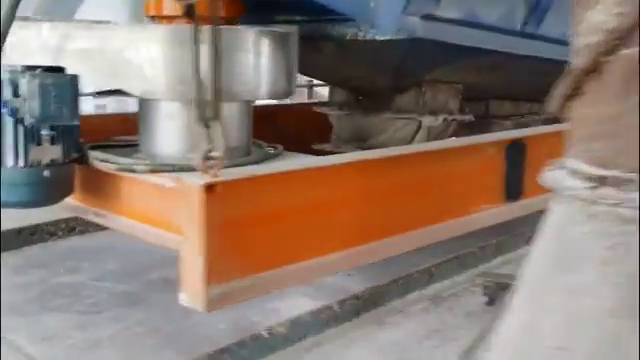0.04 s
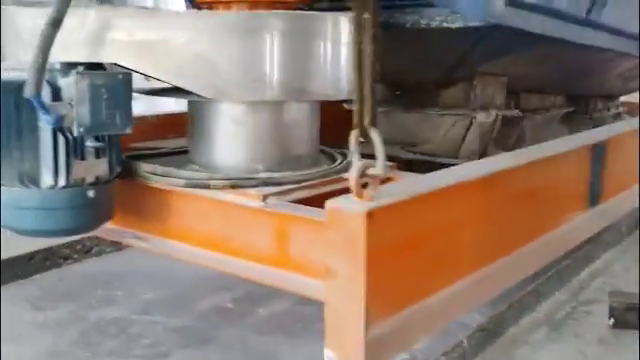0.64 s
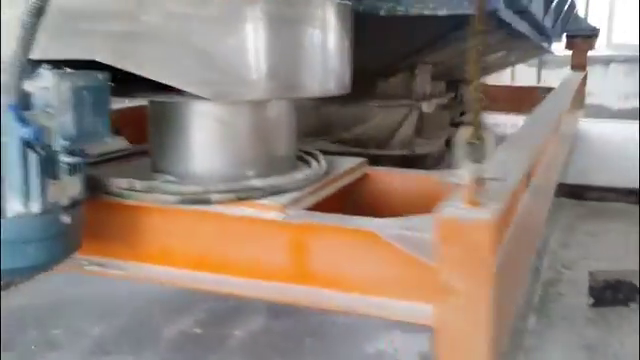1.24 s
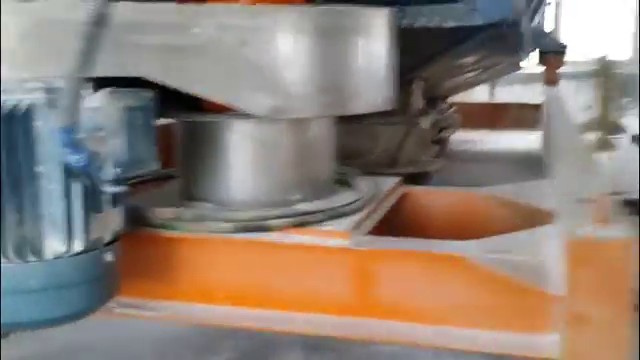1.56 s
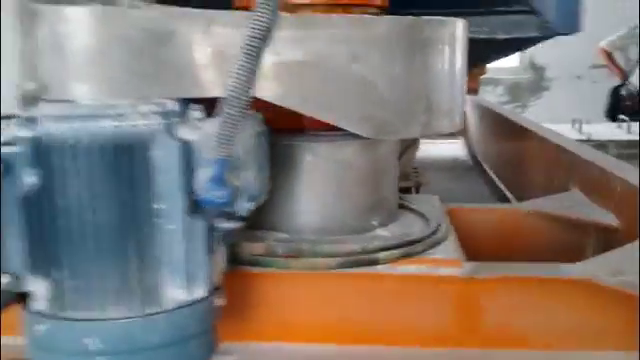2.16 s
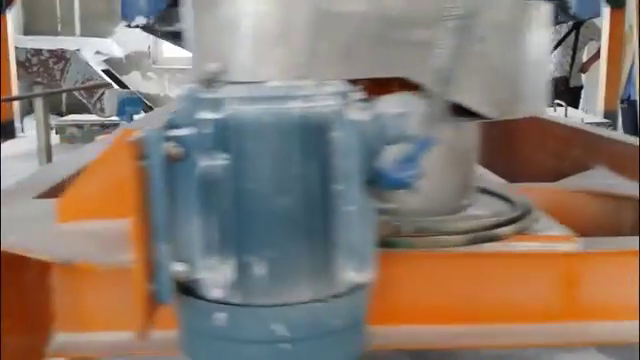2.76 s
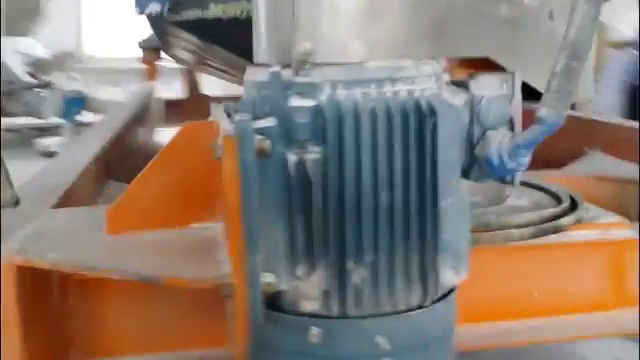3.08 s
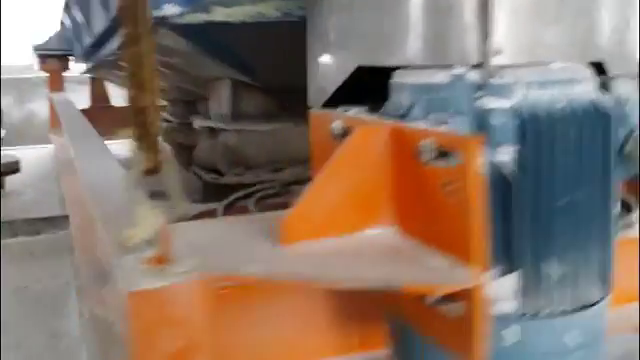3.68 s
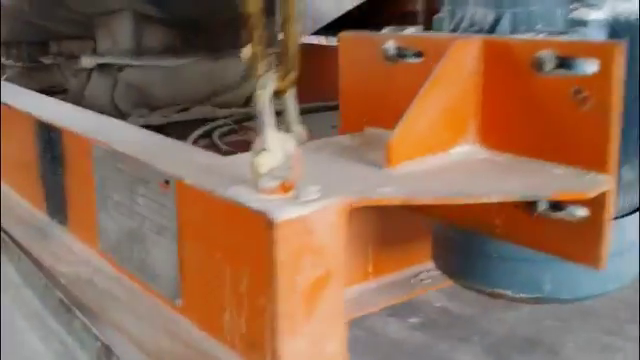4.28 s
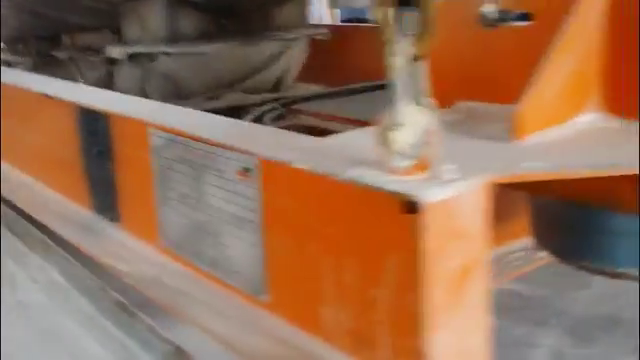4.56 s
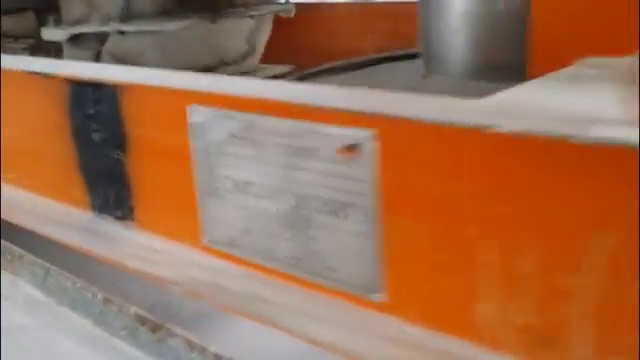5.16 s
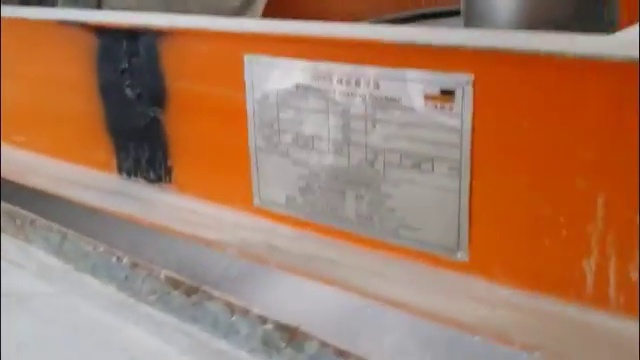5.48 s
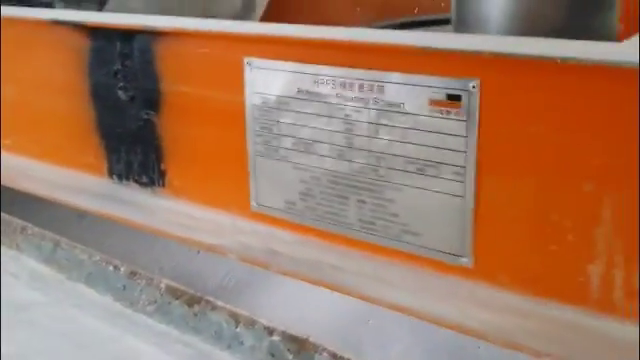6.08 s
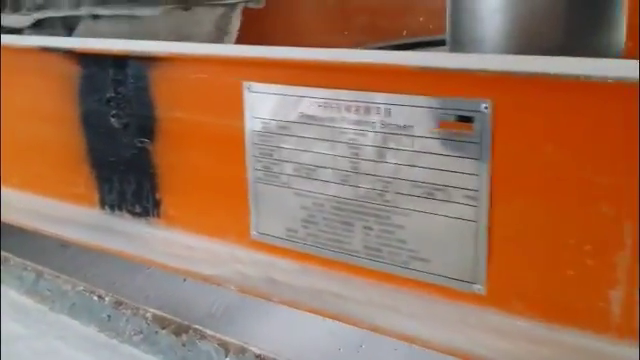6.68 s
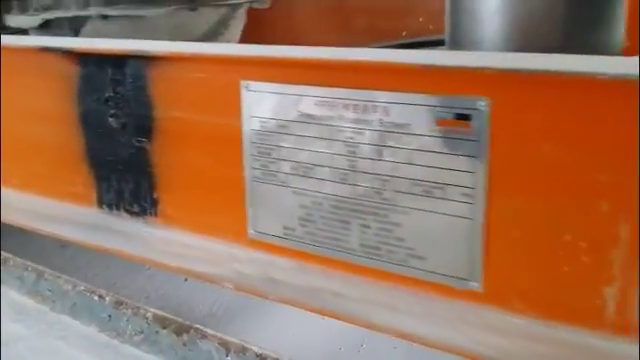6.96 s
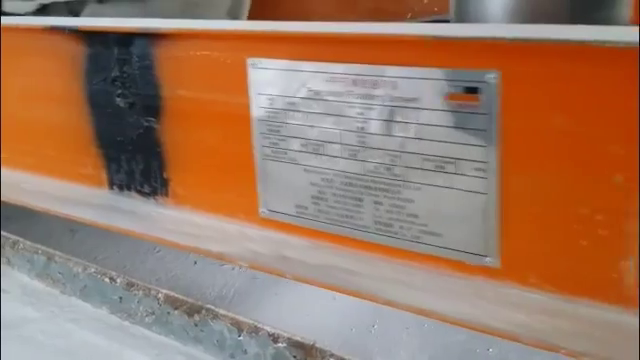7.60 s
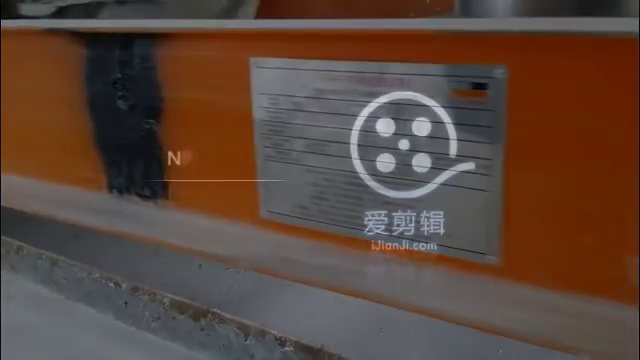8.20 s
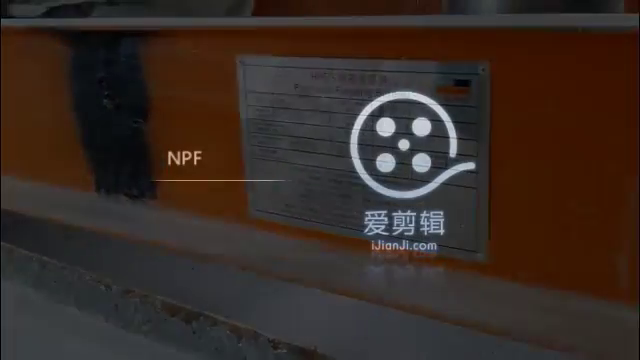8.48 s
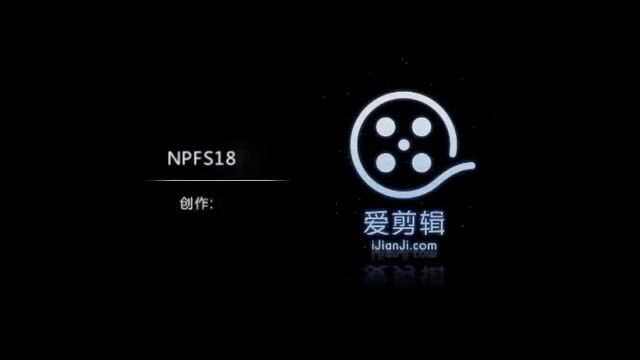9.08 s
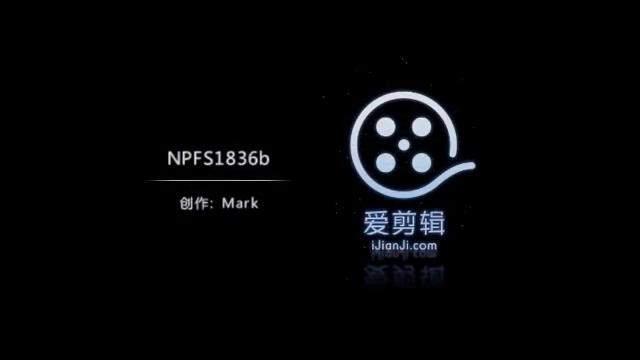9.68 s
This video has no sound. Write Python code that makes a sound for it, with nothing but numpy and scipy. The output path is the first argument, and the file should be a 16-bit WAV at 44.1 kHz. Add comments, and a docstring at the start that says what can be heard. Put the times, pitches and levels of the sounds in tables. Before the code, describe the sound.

A large industrial screening machine is already running in a factory hall: a steady low motor drone over a deep rumble. Hollow steel panels throb about four times a second and give brief, irregular booms. Underneath, balls rattle densely inside the machine and fine grit swishes softly over the mesh in a quick pulse. The microphone moves close around the drive, so the hum and a faint whine swell and dip, with a strong surge of hum at about 3.2 seconds. Between 1 and 2.5 seconds, thin metallic ringing and jingles from loose fittings stand out. Small bright ticks and very short scrapes are scattered throughout. A faint high rubbing hiss passes at around 6 seconds. From about 6 seconds the panel booms come more often and the hum pulses unevenly. At about 8.9 seconds everything cuts off abruptly, without winding down, leaving silence.

```python
"""A motor drone and a deep rumble fill a factory hall: a gyratory screening machine is running.
The motor swings the screen box about once in three turns. Steel panels throb and boom, cleaning balls
rattle under the decks, loose fittings jingle and grit swishes over the mesh. The microphone is carried
round the drive, past ringing parts and through the drone's standing waves.
Near the end the sound cuts off abruptly."""
import sys
import numpy as np
from scipy import signal
from scipy.fft import rfft, irfft, next_fast_len
from scipy.io import wavfile
from scipy.ndimage import uniform_filter1d

SR = 44100
rng = np.random.default_rng(int(sys.argv[2]) if len(sys.argv) > 2 else 0)


def file_out(sig):
    """Save sig as 16-bit WAV at sys.argv[1]."""
    # one column per channel
    cols = np.atleast_2d(sig).T
    # limit, then scale
    lim = np.clip(cols, -1, 1)
    pcm = np.round(lim * 32767).astype(np.int16)
    wavfile.write(sys.argv[1], SR, pcm)


N = 433944
TIME_S = np.arange(N) / SR
MOTOR_HZ, TURNS_PER_SWING, CUT_S = 24.88, 2.991, 8.941


# Strong motor orders. Each row: multiple, crest level in dB at the start and at the end of the walk,
# node place in m, node spacing in m, node depth in dB.
STANDING_ORDERS = [(2, -35, -30.5, 1.8, 3.1, -21), (6, -30, -26.5, 1.9, 5, -5),
                   (7, -23, -29.5, 1.26, 2.8, -10.5), (8, -25, -35, .6, 2.1, -8),
                   (17, -43, -37.5, 2.03, 3.9, -9), (19, -40, -33, 0.48, 2.6, -14.5)]
# Each row: multiple of the shaft rate, level in dB.
WEAK_ORDERS = [(1, -48.5), (3, -40.5), (4, -37), (5, -33.5), (9, -36), (11, -40), (14, -38)]
# Panel and bearing tones. Each row: frequency in Hz, level in dB.
STEADY_TONES = [(85.2, -37), (154.8, -35), (253.5, -35.5), (295.7, -37), (355.4, -41), (593.1, -38.5),
                (1487.9, -44.5)]
# Swells and dips of orders 6 (hum) and 19 (whine). Each row: centre in seconds, gain in dB.
HUM_SURGES = [(.13, 10.5), (.41, 10), (3.21, 15), (4.35, 5), (5.09, 3), (5.21, -6.5), (5.46, 5.5),
              (5.58, -12), (5.68, 6), (6.12, -12), (6.22, 3), (6.54, 8), (6.75, 5), (6.91, 9.5),
              (7.03, -9.5), (7.13, 5.5), (7.19, -4.5), (7.28, 3.5), (7.62, 8.5), (7.71, 2.5), (7.87, 8.5),
              (8.02, -11), (8.13, 6.5), (8.37, 6.5), (8.54, 3.5), (8.62, 1.5)]
WHINE_SWELLS = [(.27, 10), (1.62, 5), (2.1, 7), (2.72, -2), (3.33, 11), (5.37, 10), (5.85, 6.5), (6.1, 5),
                (6.86, 3.5), (7.15, -2.5), (7.83, 7), (8.06, -6.5), (8.3, 5), (8.62, -4), (8.83, 7)]

def motor(wander_hz, waver_db, throb_db, smear_cycles):
    """Shaft orders and panel tones waver with the load; the shaking frame makes orders throb and blur."""
    turns = np.cumsum(MOTOR_HZ + wander_hz * drift(1.5)) / SR
    surges = {6: swells(HUM_SURGES, swell_s=0.033), 19: swells(WHINE_SWELLS, swell_s=0.07)}
    orders = [(k, standing_wave(*wave) * from_db(throb_db * drift(8)) * surges.get(k, 1))
              for k, *wave in STANDING_ORDERS]
    orders += [(k, from_db(db + waver_db * drift(1.5))) for k, db in WEAK_ORDERS]
    tones = [(k * turns + smear_cycles * np.sqrt(k) * drift(5), gain) for k, gain in orders]
    tones += [(hz * TIME_S + 0.17 * drift(3), from_db(db + waver_db * drift(2)))
              for hz, db in STEADY_TONES]
    return sum(gain * sine(cycles + rng.random()) for cycles, gain in tones)


# Each row: frequency in Hz, spectral level in dB.
RUMBLE_SPECTRUM = [(15, -24.5), (38, -18.5), (52, -8), (72, -4.5), (110, -3.5), (148, -4.5), (180, 1),
                   (290, -3.5), (380, -4.5), (520, -5), (620, -7.5), (720, -8.5), (1000, -26.5),
                   (1500, -31), (3000, -66.5)]

def box_rumble():
    """The heavy box shudders, filling the hall evenly."""
    return rms_one(shaped(hall_noise(), RUMBLE_SPECTRUM) * from_db(0.5 * drift(20)))


# Each row: frequency in Hz, width in Hz, level in dB.
BASE_MODES = [(86, 24, 0.5), (112, 68, -3.2)]
FRAME_MODES = [(249, 34, -6), (296.8, 13, 2.5)]
# Each row: centre in seconds, gain in dB.
FRAME_SWELLS = [(.27, 4.5), (.52, 1.5), (.92, 4), (1.9, -5), (2.2, -5.5), (2.85, 5), (3.35, 5.5),
                (4.9, 6.5), (5.42, -8), (6.57, -4.5), (8.45, -4)]

def mounting_ring():
    """Base and frame drum in their low modes; the frame's ring swells and fades."""
    base = passing(place_m=4, closest_m=1.6, db=-25.5) * panel(BASE_MODES, uneven_db=1.5)
    frame = passing(place_m=0.3, closest_m=3.0, db=-27) * panel(FRAME_MODES, uneven_db=0.5)
    return base + frame * swells(FRAME_SWELLS, swell_s=0.051)


# Each row: frequency in Hz, width in Hz, level in dB.
HOUSING_MODES = [(487, 21, -16.5), (560, 39, -8), (614, 27, -1.5), (649, 35, -3), (709, 30, -11)]
BRACKET_MODES = [(567, 57, 0)]

def housing_throb():
    """The hollow housing hums, steadied as it rings on; it and a bracket throb every second swing."""
    hum = panel(HOUSING_MODES, uneven_db=-0.5)
    hum_rms = np.sqrt(uniform_filter1d(np.mean(hum ** 2, axis=0), size=SR // 12) + 1e-9)
    housing = passing(place_m=5.6, closest_m=3.8, db=-27) * hum / hum_rms
    bracket = passing(place_m=2.2, closest_m=0.5, db=-32.5) * panel(BRACKET_MODES, uneven_db=2.5)
    return (housing + bracket) * swing(at_s=0.064, depth_db=2.0, every=2)


# Each row: peak time in seconds, pitch in Hz, level in dB.
BOOMS = [(.56, 610, -23), (1.5, 862, -26), (1.54, 595, -23), (1.68, 750, -31), (1.72, 632, -25),
         (1.81, 765, -25.5), (1.89, 773, -27.5), (1.98, 631, -25), (2.25, 634, -24.5), (2.97, 570, -23),
         (3.11, 588, -25), (3.22, 565, -25), (3.4, 580, -25), (3.6, 615, -22), (3.85, 555, -26.5),
         (4.17, 553, -21), (4.67, 576, -27), (4.93, 603, -26.5), (5.1, 575, -23.5), (5.28, 634, -21),
         (5.59, 603, -27), (6.15, 606, -25), (6.3, 592, -24.5), (6.53, 612, -22.5), (6.66, 577, -24.5),
         (6.78, 637, -22), (6.82, 578, -19.5), (7.52, 620, -28.5), (7.66, 643, -25.5), (7.74, 613, -22.5),
         (8.02, 622, -18), (8.21, 644, -21), (8.46, 633, -23.5), (8.63, 631, -23.5), (8.73, 616, -25.5),
         (8.83, 610, -23.5), (8.92, 591, -27)]

def panel_booms():
    """Steel panels boom briefly, each at its own sagging pitch."""
    return ring_outs(BOOMS, swell_s=0.03, sag_hz_per_s=280, waver_cycles=0.16)


# Each row: frequency in Hz, width in Hz, level in dB.
GUARD_MODES = [(790, 43, -3.5), (842, 40, -5.5), (870, 45, -6), (2070, 36, -3.5)]
# Each row: frequency in Hz, level in dB.
GUARD_TONES = [(2096, -6), (3026, -20)]

def guard_ring(waver_cycles, flicker_db):
    """The shaken guard rings and holds two thin, unsteady notes that reach each port by its own path."""
    ring = panel(GUARD_MODES, uneven_db=1.0)
    for port in range(2):
        for hz, db in GUARD_TONES:
            gain = from_db(db + flicker_db * drift(5.2))
            ring[port] += gain * sine(hz * TIME_S + waver_cycles * drift(25))
    return passing(place_m=1.5, closest_m=0.25, db=-28) * ring


# Each row: frequency in Hz, spectral level in dB.
DECK_SPECTRUM = [(300, -19), (600, -5.5), (920, -1), (1150, -3), (1450, -0.5), (1750, 2), (1930, -1),
                 (2300, 0.5), (2550, -5.5), (2850, -8), (3500, -17.5), (5000, -22), (9000, -48)]
# Each row: frequency in Hz, width in Hz, level in dB.
DECK_MODES = [(931, 55, 1), (1039, 45, 0.5), (1222, 39, -1.5), (1363, 40, 0.5), (1634, 21, -0.5),
              (1833, 27, 0.5), (2095, 22, 6.5), (2172, 40, 3.5), (2191, 25, 4.5), (2240, 30, -0.5),
              (2300, 44, 2), (2367, 50, -0.5), (2515, 50, -4.5), (3030, 45, -6.5), (3290, 30, -14),
              (4652, 40, -10.5)]
# The balls bunch up. Each row: centre in seconds, gain in dB.
FLURRIES = [(1.5, 2), (1.8, 2), (1.92, 2), (3.09, 1), (6.08, 1), (6.2, -0.5), (6.43, 1.5), (6.8, 3),
            (7.09, 1.5), (7.52, 0), (8.08, 1.5)]

def ball_rattle():
    """Cleaning balls patter densely under the decks; fewer, harder bounces set the steel ringing."""
    patter = impacts(per_s=1000 * swing(at_s=0.038, depth_db=-1.0), spread_db=3.0, t60_s=0.16)
    bounces = impacts(per_s=160 * swing(at_s=0.042, depth_db=0.2), spread_db=1.0, t60_s=0.12)
    rattle = rms_one(shaped(patter, DECK_SPECTRUM) + shaped(bounces, modes=DECK_MODES))
    return passing(place_m=3.67, closest_m=6.6, db=-22.5) * rattle * swells(FLURRIES, swell_s=0.035)


# Each row: peak time in seconds, pitch in Hz, level in dB.
JINGLES = [(.04, 3033, -40), (.21, 3028, -40), (.21, 2050, -34), (.33, 3335, -42), (.35, 4630, -43.5),
           (.96, 3011, -42.5), (1.09, 4653, -44.5), (1.18, 2110, -28), (1.17, 4659, -40.5),
           (1.33, 3021, -40.5), (1.46, 2110, -29.5), (1.6, 2110, -31), (1.7, 3026, -41), (1.8, 2104, -28.5),
           (1.84, 4654, -41), (1.89, 2100, -24.5), (1.89, 3020, -37.5), (1.98, 3028, -38),
           (2.09, 4700, -45), (3.36, 3305, -45), (3.5, 3300, -41), (4.1, 2080, -29), (4.29, 4593, -44),
           (5.44, 4660, -44.5), (6.89, 3300, -41), (7.11, 3011, -40), (8.48, 2094, -25.5),
           (8.72, 3313, -44)]

def fitting_jingles(chatter_db):
    """Loose steel fittings chatter as they ring, reaching each port by its own path."""
    ports = []
    for _ in range(2):
        rings = ring_outs(JINGLES, swell_s=0.045, sag_hz_per_s=0, waver_cycles=0.13)
        ports.append(rings * rms_one(from_db(chatter_db * drift(130))))
    return np.array(ports)


# Each row: frequency in Hz, spectral level in dB.
GRIT_SPECTRUM = [(1500, -10), (3000, 0.5), (4000, 1.5), (5000, 1), (6400, -1.5), (8000, -2), (10000, -4.5),
                 (10800, -9), (12000, -11), (13000, -21.5), (14300, -32.5)]

def grit_swish():
    """Fine grit slides over the mesh, swelling once a swing, more distinctly as time goes on."""
    grains = shaped(impacts(per_s=7600, spread_db=0.5, t60_s=0.036), GRIT_SPECTRUM)
    depth_db = np.interp(TIME_S, [0, CUT_S], [0.3, 1.1]) * (1 + 0.3 * drift(1.7))
    swish = grains * swing(at_s=0.083, depth_db=depth_db) * from_db(0.39 * drift(14))
    return passing(place_m=4.1, closest_m=12, db=-33) * rms_one(swish)


# Each row: start in seconds, splash level in dB, ring level in dB.
TICKS = [(1.135, -30, -36.5), (1.80, -39, -38), (2.10, -30, -39.5), (3.79, -32, -45.5), (4.26, -39, -40),
         (4.517, -32, -36), (5.0, -33, -39.5), (5.42, -38.5, -41), (6.55, -33.5, -44.5)]
# Each row: frequency in Hz, width in Hz, level in dB.
RIM_MODES = [(2120, 28, 8.5), (3000, 25, -5.5), (3230, 28, -5), (4650, 22, 0)]

def rim_ticks():
    """Coarser bits strike with a short bright splash and leave the steel rim ringing."""
    start_s, splash_db, ring_db = np.transpose(TICKS)
    splash = struck(start_s, splash_db, t60_s=0.25) * rms_one(shaped(hall_noise(), GRIT_SPECTRUM))
    ring = struck(start_s, ring_db, t60_s=0.54) * panel(RIM_MODES, uneven_db=4.0)
    return splash + ring


# Each row: start in seconds, length in seconds, level in dB.
SCRAPES = [(0.058, 0.024, -33), (.52, .04, -31.5), (1.485, 0.023, -30), (5.002, .012, -30.5),
           (7.037, 0.036, -36), (7.509, .04, -29.5), (7.993, 0.028, -29.5), (8.716, 0.019, -35)]
# Each row: frequency in Hz, spectral level in dB.
SCRAPE_SPECTRUM = [(800, -14), (1500, 1.5), (2800, 5), (4800, -3), (6200, -6.5), (9000, -14), (13000, -34)]

def lump_scrapes(attack_s, release_s):
    """Each lump skids over the deck as a dense run of tiny catches."""
    envelope = np.zeros(N)
    for start_s, length_s, db in SCRAPES:
        rise = np.clip((TIME_S - start_s) / attack_s, 0, 1)
        fall = np.exp(-np.maximum(TIME_S - start_s - length_s, 0) / release_s)
        envelope += from_db(db) * rise * fall
    catches = impacts(per_s=900, spread_db=4.5, t60_s=0.02)
    return envelope * rms_one(shaped(catches, SCRAPE_SPECTRUM))


# Each row: frequency in Hz, width in Hz, level in dB.
RUB_MODES = [(7350, 260, 2), (7800, 260, -6)]

def steel_rub(peak_s, swell_s, db):
    """A light rub on the steel: a thin high hiss swells and fades."""
    return from_db(db) * bell(TIME_S - peak_s, swell_s) * panel(RUB_MODES, uneven_db=4.5)


# Each row: frequency in Hz, correlation between the two microphone ports.
PORT_CORRELATION = [(60, 0.99), (330, 0.89), (520, 0.66), (720, 0.76), (1000, 0.46), (1250, -0.039),
                    (1700, -.2), (2250, 0.25), (2700, -0.021), (5000, -0.021)]

def hall_noise():
    """Noise from all sides: alike at both ports in the bass, unrelated in the treble."""
    size = next_fast_len(N)
    left, other = rfft(rng.standard_normal((2, size)))
    alike = np.interp(np.arange(len(left)) * SR / size, *np.transpose(PORT_CORRELATION))
    right = alike * left + np.sqrt(1 - alike ** 2) * other
    return irfft(np.array([left, right]), size)[:, :N]


# Microphone path. Each row: time in seconds, distance walked in m.
WALK = [(0, 0.5), (5.7, 4), (8.9, 4.5)]

def walked_m():
    """Distance the microphone has been carried, per sample."""
    return np.interp(TIME_S, *np.transpose(WALK))


def passing(place_m, closest_m, db):
    """Gain of a part the microphone passes: `db` when closest, falling with distance."""
    return from_db(db) * closest_m / np.hypot(closest_m, walked_m() - place_m)


def standing_wave(start_db, end_db, node_m, spacing_m, depth_db):
    """Gain of a tone as the microphone crosses its crests and nodes."""
    path_m = walked_m()
    crest = from_db(start_db + (end_db - start_db) * path_m / path_m[-1])
    off_node = np.sin(np.pi * (path_m - node_m) / spacing_m) ** 2
    return crest * np.sqrt(off_node + (1 - off_node) * from_db(depth_db) ** 2)


def swing(at_s, depth_db, every=1):
    """Gain that cycles once per `every` swings of the box, reaching `depth_db` at `at_s`."""
    swings = (TIME_S - at_s) * MOTOR_HZ / TURNS_PER_SWING
    return from_db(depth_db * np.cos(2 * np.pi * swings / every))


def panel(modes, uneven_db):
    """Sheet steel drums in its modes, shaken unevenly."""
    return rms_one(shaped(hall_noise(), modes=modes) * from_db(uneven_db * drift(18)))


def ring_outs(rows, swell_s, sag_hz_per_s, waver_cycles):
    """Each shaken part swells and dies at its own wavering pitch, which may sag."""
    rings, waver = np.zeros(N), waver_cycles * drift(30)
    for peak_s, hz, db in rows:
        span = np.abs(TIME_S - peak_s) < 0.5
        t = TIME_S[span] - peak_s
        cycles = hz * t - 0.5 * sag_hz_per_s * t ** 2 + waver[span] + rng.random()
        rings[span] += from_db(db) * bell(t, swell_s) * sine(cycles)
    return rings


def impacts(per_s, spread_db, t60_s):
    """Random uneven hits, each dying away in the box and the hall; their powers add."""
    hits = rng.random(N) < per_s / SR
    strength = from_db(spread_db * np.clip(rng.standard_normal(N), -2, 2))
    power = signal.lfilter([1], [1, -from_db(-60 / (t60_s * SR)) ** 2], hits * strength ** 2 + 1e-18)
    return rms_one(np.sqrt(power) * hall_noise())


def struck(start_s, db, t60_s):
    """Envelope that jumps at each hit and dies away."""
    hits = np.bincount((start_s * SR).astype(int), from_db(db), N)
    return signal.lfilter([1], [1, -from_db(-60 / (t60_s * SR))], hits + 1e-18)


def swells(rows, swell_s):
    """Gain that rises or dips briefly round each listed moment."""
    coarse_s = TIME_S[::40]
    gain_db = sum(db * bell(coarse_s - centre_s, swell_s) for centre_s, db in rows)
    return np.interp(TIME_S, coarse_s, from_db(gain_db))


def shaped(x, spectrum=(), modes=()):
    """Filter by a broad spectrum plus steep-sided resonances; their powers add."""
    size = next_fast_len(N)
    hz = np.arange(size // 2 + 1) * SR / size + 1e-3
    power = sum(from_db(db) ** 2 / (1 + 2 * ((hz - mode_hz) / width_hz) ** 2) ** 2
                for mode_hz, width_hz, db in modes)
    if len(spectrum):
        knot_hz, db = np.transpose(spectrum)
        power = power + from_db(np.interp(np.log(hz), np.log(knot_hz), db)) ** 2
    return irfft(rfft(x, size) * np.sqrt(power), size)[..., :N]


def drift(per_s):
    """Smooth random curve of spread 1, with `per_s` knots a second."""
    knots = rng.standard_normal(int(per_s * N / SR) + 4)
    fine = signal.resample(knots, 10 * len(knots))
    return np.interp(TIME_S * per_s * 10, np.arange(len(fine)), fine)


def bell(offset_s, sigma_s):
    """Gaussian envelope."""
    return np.exp(-0.5 * (offset_s / sigma_s) ** 2)


def sine(cycles):
    """Sine of rms 1."""
    return np.sqrt(2) * np.sin(2 * np.pi * cycles)


def from_db(db):
    """Decibels to gain."""
    return 10 ** (np.asarray(db) / 20)


def rms_one(x):
    """Scale to rms 1."""
    return x / np.sqrt(np.mean(x ** 2) + 1e-20)


def scene():
    """All parts of the machine sound together until the sound cuts off abruptly."""
    mix = from_db(0.37) * motor(wander_hz=0.035, waver_db=2.5, throb_db=1.45, smear_cycles=0.018)
    mix = mix + from_db(-19) * box_rumble()
    mix += mounting_ring() + housing_throb() + panel_booms()
    mix += guard_ring(waver_cycles=0.2, flicker_db=3.5)
    mix += ball_rattle() + fitting_jingles(chatter_db=3)
    mix += grit_swish() + rim_ticks() + lump_scrapes(attack_s=0.0048, release_s=0.014)
    mix += steel_rub(peak_s=6.25, swell_s=0.21, db=-47)
    cut_db = -60 * np.clip((TIME_S - CUT_S) / 0.025, 0, 3)
    return from_db(1.18 + cut_db) * mix


# Left port response. Each row: frequency in Hz, gain against the right port in dB.
LEFT_PORT = [(60, -2.5), (700, -3), (1200, -2.5), (2200, -7), (3300, -3), (4500, -2.5), (5800, -3.5),
             (7400, 1.5), (8300, -0.5), (9200, -7), (10000, -17.5), (11500, -34)]

def record(dry):
    """The left port is quieter and duller; both are low-passed at 14 kHz."""
    ports = np.array([shaped(dry[0], LEFT_PORT), dry[1]])
    return signal.sosfilt(signal.ellip(10, 0.1, 90, 14000, fs=SR, output="sos"), ports)


dry = scene()
out = record(dry)
file_out(out)
```